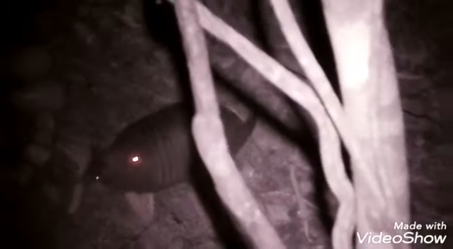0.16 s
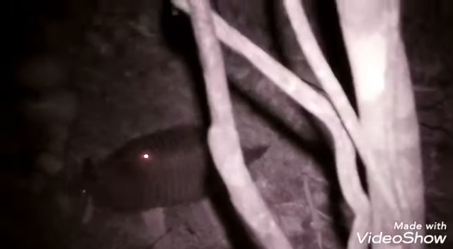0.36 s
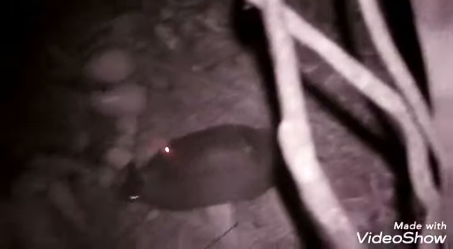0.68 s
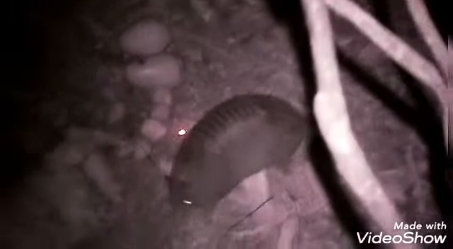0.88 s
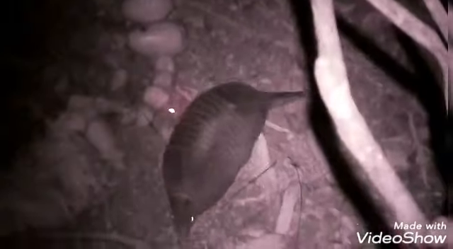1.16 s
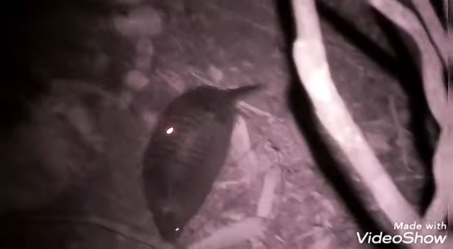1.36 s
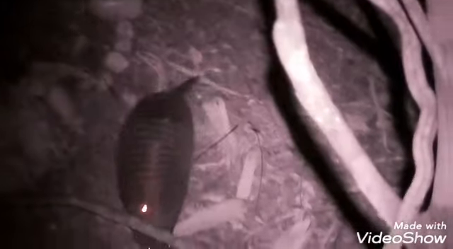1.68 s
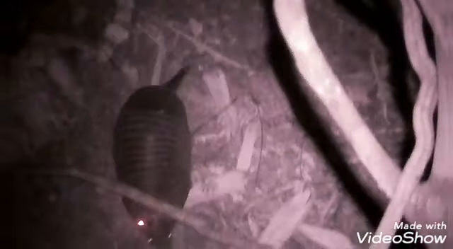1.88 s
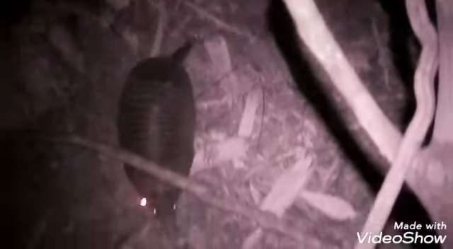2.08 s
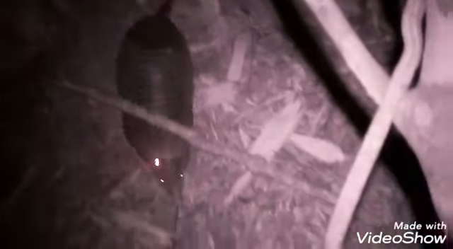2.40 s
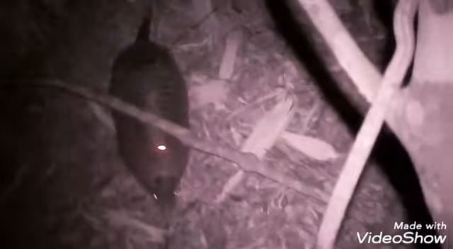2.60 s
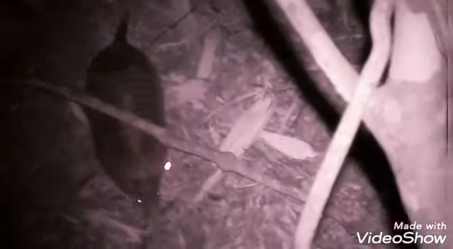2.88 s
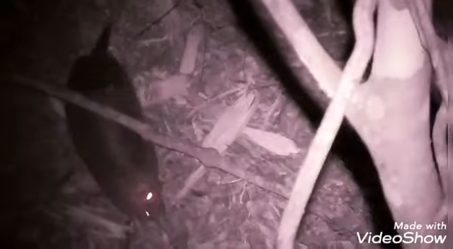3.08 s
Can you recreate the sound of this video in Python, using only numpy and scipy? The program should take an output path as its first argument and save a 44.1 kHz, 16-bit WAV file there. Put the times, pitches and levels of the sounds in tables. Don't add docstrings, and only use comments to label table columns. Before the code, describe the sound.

Dense high cricket chorus outdoors at night, close mono microphone; the nearest singer pauses briefly around one second, then resumes. Fainter trills, tiny frog-like croaks and pings, soft low hum and hiss underneath.

```python
import sys
import numpy as np
from scipy import signal
from scipy.io import wavfile
from scipy.ndimage import uniform_filter1d

SR = 44100
rng = np.random.default_rng(int(sys.argv[2]) if len(sys.argv) > 2 else 0)


def natural_amplitude(level_db):
    exponent = np.asarray(level_db, float) / 20
    return 10 ** exponent


def transcribe(signal):
    frames = np.atleast_2d(signal).T
    limited = np.clip(frames, -1, 1)
    pcm = np.round(limited * 32767).astype(np.int16)
    wavfile.write(sys.argv[1], SR, pcm)


N = 143325

# start_s, level_db, repeat_s
HIGH_SONG = [
    (.022, -50, .1057),
    (.339, -47, .1056),
    (1.078, -43.5, .1055),
    (1.5, -43, .104),
    (1.917, -43, .104),
    (2.542, -44, .105),
    (3.274, -44, 1),
]
SIDE_SONG = [
    (-.02, -51, .106),
    (.401, -45.5, .1065),
    (.827, -47, .1065),
    (1.04, -54, .1065),
    (1.466, -53, 1),
    (1.586, -45, .101),
    (1.99, -56, 1),
    (2.132, -44, .107),
    (3.307, -53.5, 1),
]
LOW_SONG = [
    (.567, -53, .104),
    (.879, -51, .102),
    (1.288, -51, .104),
    (1.81, -53, .104),
    (2.016, -52, .104),
    (2.766, -53, .104),
    (3.28, -53, 1),
]
GLIDE_SONG = [
    (-.011, -56, .0286),
    (.504, -56, .0302),
    (1.017, -56, .03),
    (1.406, -56, 1),
    (1.432, -56, .0243),
    (1.943, -56, .0258),
    (2.149, -56, .0276),
    (2.397, -56, .029),
    (2.775, -56, .0297),
    (3.252, -56, 1),
]
PIPE_SONG = [
    (.31, -71, .037),
    (.423, -65, .04),
    (.504, -64, .034),
    (.641, -62, .035),
    (.851, -62, .0355),
    (1.67, -62, .0357),
    (2.099, -61.5, .036),
    (2.173, -65, 1),
]
RISING_SONG = [
    (.3, -72, .036),
    (.47, -67, .036),
    (2.26, -74, 1),
]
BUZZ_SONG = [
    (.394, -70, .01235),
    (.55, -67, .01235),
    (.9, -68, .0125),
    (.95, -76, 1),
    (2.5, -76, .0125),
    (3.26, -70, 1),
]
FAST_SONG = [
    (.6, -62, .0135),
    (.92, -56, .0135),
    (1.06, -54, .0135),
    (1.4, -55, .0135),
    (1.6, -61, .0135),
    (2.4, -62, .0135),
    (2.6, -58, .0135),
    (3.26, -55, 1),
]
TICK_SONG = [
    (.2, -69, .103),
    (.407, -65, .101),
    (.707, -66, .103),
    (1.118, -73, .104),
    (1.433, -68, .104),
    (1.744, -71, .104),
    (1.953, -68, 1),
]
FROG_SONG = [(.07, -71, .019), (.36, -66, .0195), (.58, -67, .02), (.69, -73, 1), (.93, -68, .019),
             (1.03, -69, 1), (1.125, -69, .02), (1.31, -70, 1), (1.752, -67, .022), (2.072, -66, 1),
             (2.43, -69, .02), (2.716, -65, .019), (2.85, -69, .02), (2.98, -72, 1), (3.128, -70, .018),
             (3.26, -69, 1)]
TOAD_SONG = [
    (1.43, -72, .02),
    (1.66, -73, 9),
    (3.08, -71, .02),
    (3.26, -71, 1),
]
BELL_SONG = [
    (.523, -61, 1),
    (.598, -61, 9),
    (2.85, -59, 1),
    (2.917, -59.5, 1),
]
CHIME_SONG = [
    (1.33, -67, 1),
    (1.395, -67, 1),
    (1.775, -66.5, 1),
    (1.842, -66, 1),
    (2.408, -64.5, 1),
    (2.475, -65, 1),
    (2.829, -65, 1),
    (2.893, -67, 1),
    (3.245, -65, 1),
]
PEEP_SONG = [
    (2.08, -71, 1),
    (2.725, -70, 1),
    (3.1, -71, 1),
]
# start_s, first_stroke_db, second_stroke_db
LOUD_CHIRPS = [(.002, -38, -38), (.107, -37.5, -40), (.212, -44, -36.5), (.318, -39.5, -38),
               (.416, -40.5, -41.5), (.523, -39, -38), (.626, -38.5, -40.5), (.733, -38.5, -39.5),
               (.842, -42, -42.5), (0.943, -45, -59), (1.478, -39, -40), (1.581, -44, -41),
               (1.682, -40.5, -38), (1.784, -41.5, -40), (1.889, -44, -39.5), (1.995, -40, -38),
               (2.101, -37, -40), (2.199, -38, -38.5), (2.304, -43.5, -44), (2.4, -37.5, -46),
               (2.558, -42.5, -48), (2.661, -41, -43), (2.761, -40, -36.5), (2.865, -44, -47),
               (2.969, -39.5, -41), (3.069, -39, -40.5), (3.166, -42.5, -39.5), (3.27, -47, -47)]

# pitch_hz, sag_ratio, length_s, second_harmonic_db, third_harmonic_db
HIGH_VOICE = (4132, .09, .028, -28, -25)
SIDE_VOICE = (4125, .08, .027, -19, -27)
LOW_VOICE = (3880, .06, .027, -21, -18)
LOUD_VOICE = (4012, .06, .027, -35, -31)
GLIDE_VOICE = (5390, .085, .02)
PIPE_VOICE = (4572, .02, .025, -40, -12)
RISING_VOICE = (4450, .04, .022)
BUZZ_VOICE = (5030, .04, .009, 2, -2.5)
FAST_VOICE = (4990, .03, .011, -26)
TICK_VOICE = (7060, .04, .011)
FROG_VOICE = (2170, .07, .012)
TOAD_VOICE = (2340, .05, .012)
BELL_VOICE = (3330, .025, .021)
CHIME_VOICE = (3080, .05, .018)
PEEP_VOICE = (3210, .02, .022)
# time_s, pitch_ratio
PIPE_WARMING = ((.3, .56), (.935, 1))

# lowest_hz, highest_hz, level_db, repeat_s
FAR_PAIRS = (3965, 4035, -48, .104)
FAR_DULL = (3660, 3900, -57.5, .106)
FAR_TRILLS = (4980, 5330, -60.5, .027)
FAR_MID = (4240, 4850, -66.5, .03)
# sag_ratio, length_s, second_harmonic_db, third_harmonic_db
FAR_PAIR_VOICE = (.08, .027, -25, -25)
FAR_TRILL_VOICE = (.05, .019, -28, -34)

# freq_hz, density_db
HUM_SPECTRUM = [(21, -30), (35, 0.5), (158, -9.5), (239, -4.5), (402, -10), (652, -10.5), (1900, -21.5),
                (2470, -18), (4180, -120)]
HISS_SPECTRUM = [(1500, -4), (3000, 0), (5500, 1), (7000, -1.8), (13000, 0.5), (15000, -4.7), (16000, 6.5)]
ROAD_SPECTRUM = [(200, 6), (350, -2), (700, -1), (1100, -7), (1600, -13)]
# time_s, level_db
ROAD_LEVEL = [
    (0.0, -59),
    (.25, -63.5),
    (.45, -68.5),
    (.8, -62),
    (1.3, -59.5),
    (1.6, -69),
    (2.3, -73),
    (3.25, -92),
]

# start_s, level_db, length_s, centre_hz
RUSTLES = [(0.0, -62, .03, 7000), (.1, -66, .04, 9000), (.195, -64, .02, 9000), (.43, -67, .03, 14000),
           (.63, -67, .04, 9000), (.815, -63, .03, 10000), (1.14, -62, .02, 6000), (1.24, -64, .031, 8000),
           (1.8, -69, .15, 9000), (2.135, -59, .016, 17000), (2.742, -60, .045, 10000),
           (2.848, -65, .02, 10000)]
# start_s, peak_db
TICKS = [
    (.195, -54),
    (.44, -57),
    (.82, -55),
    (1.1413, -54),
    (2.143, -53),
    (2.2992, -61),
    (2.5641, -57),
    (2.778, -54),
    (2.8489, -56),
    (3.0609, -60),
]

PAIR_S, BELL_PAIR_S = .032, .021
LATE, LATE_BEND = 1.7, 7


def evened(x):
    return x / np.sqrt(np.mean(x ** 2) + 1e-20)


def add(mix, start_s, sound):
    at = round(start_s * SR)
    part = mix[max(at, 0):max(at + len(sound), 0)]
    part += sound[max(-at, 0):][:len(part)]


def stroke(bend, late, turn, hz, sag, length_s, second_db=-40, third_db=-40):
    u = np.arange(0, length_s, 1 / SR) / length_s
    pitch_hz = hz * (1 - sag * u ** bend)
    phase = 2 * np.pi * (np.cumsum(pitch_hz) / SR + turn)
    tone = np.sin(phase) + natural_amplitude(second_db) * np.sin(2 * phase) + natural_amplitude(third_db) * np.sin(3 * phase)
    swell = np.sin(np.pi * u ** late) ** .8
    return 1.5 * swell * tone


def sing(song, voice, pair_s=None, second_db=0, bend=5, wobble_db=.9, waver=.002, late=1.2,
         warming=((0, 1), (1, 1))):
    out, marks = np.zeros(N), np.array(song, float)
    runs = []
    for (start_s, _, repeat_s), end_s in zip(song, marks[1:, 0]):
        calls = max(round((end_s - start_s) / repeat_s), 1)
        runs.append(np.linspace(start_s, end_s, calls, endpoint=False))
    times = np.append(np.concatenate(runs), marks[-1, 0])
    hz, *shape = voice
    peak_s = (.5 ** (1 / late) - .06) * voice[2]
    luck = rng.standard_normal((300, 8))
    for s, r in zip(times, luck):
        level_db = np.interp(s, marks[:, 0], marks[:, 1])
        warm_hz = hz * np.interp(s, *warming)
        for k in range(2 if pair_s else 1):
            db = level_db + wobble_db * r[k] + k * second_db
            one = stroke(bend, late, r[4 + k], warm_hz * (1 + waver * r[2 + k]), *shape)
            add(out, s + k * (pair_s or 0) + .0008 * r[6 + k] - peak_s, natural_amplitude(db) * one)
    return out


def pair_crickets():
    out = np.zeros(N)
    for song, voice in ((HIGH_SONG, HIGH_VOICE), (SIDE_SONG, SIDE_VOICE), (LOW_SONG, LOW_VOICE)):
        out += sing(song, voice, PAIR_S, second_db=.3, bend=LATE_BEND, late=LATE)
    strokes = []
    for start_s, *pair_db in LOUD_CHIRPS:
        for k, db in enumerate(pair_db):
            strokes.append((start_s + k * PAIR_S, db, np.inf))
    return out + sing(strokes, LOUD_VOICE, bend=LATE_BEND, late=LATE)


def gliding_triller():
    return sing(GLIDE_SONG, GLIDE_VOICE, bend=1.3, wobble_db=1.6, waver=.005)


def crowd(lo_hz, hi_hz, level_db, repeat_s, voice, pair_s, count):
    out = np.zeros(N)
    waver = .004 if pair_s else .008
    for k, (late, pace, loud) in enumerate(rng.random((count, 3))):
        hz = lo_hz + (hi_hz - lo_hz) * k / (count - 1)
        start = (-repeat_s * late, 6 * loud, repeat_s * (.96 + .08 * pace))
        end = (N / SR + late * repeat_s, 6 - 6 * loud, 1)
        out += sing([start, end], (hz, *voice), pair_s, bend=LATE_BEND, wobble_db=1.5, waver=waver, late=LATE)
    return natural_amplitude(level_db) * evened(out)


def far_chorus():
    pairs = crowd(*FAR_PAIRS, FAR_PAIR_VOICE, PAIR_S, count=11)
    dull = crowd(*FAR_DULL, (.06, .027, -15, -17), PAIR_S, count=9)
    trills = crowd(*FAR_TRILLS, FAR_TRILL_VOICE, None, count=6)
    mid = crowd(*FAR_MID, FAR_TRILL_VOICE, None, count=8)
    return pairs + dull + trills + mid


def foliage_scatter(x):
    t60_s, onset_s = .22, .012
    t = np.arange(SR // 2) / SR
    tail = rng.standard_normal(len(t)) * natural_amplitude(-60 * t / t60_s) * np.minimum(t / onset_s, 1)
    return signal.fftconvolve(x, tail / np.linalg.norm(tail))[:N]


def leaf_rustles():
    out = np.zeros(N)
    for start_s, level_db, length_s, hz in RUSTLES:
        spikes_db = 2.5 * np.minimum(rng.exponential(1, SR // 2), 3)
        grit = rng.standard_normal(SR // 2) * natural_amplitude(spikes_db)
        edges_hz = [hz * .45, min(hz * 1.8, SR / 2.1)]
        band = signal.butter(2, edges_hz, "band", fs=SR, output="sos")
        grit = evened(signal.sosfilt(band, grit))
        u = np.arange(SR // 2) / SR / length_s
        add(out, start_s, natural_amplitude(level_db + 3.5) * grit * np.minimum(u / .15, 1) * np.exp(-u ** 2))
    return out


def noise(spectrum, patchy_db):
    frames, hz = N // 256 + 5, np.fft.rfftfreq(1024, 1 / SR)
    a, b, patches = rng.standard_normal((frames, 513, 3)).T
    patches = uniform_filter1d(patches, size=14, axis=0)
    patches = evened(uniform_filter1d(patches, size=12, axis=1))
    f, db = np.transpose(spectrum)
    shape_db = np.interp(np.log(hz + 1), np.log(f + 1), db, left=-30, right=-60)
    cells = (a + 1j * b) * natural_amplitude(shape_db[:, None] + patchy_db * patches)
    return evened(signal.istft(cells, nperseg=1024, noverlap=768)[1][:N])


def air():
    t = np.arange(N) / SR
    drone = natural_amplitude(-65) * np.minimum(.15 + 1.6 * t, 1.2) * np.sin(2 * np.pi * 30 * t + 2 * np.sin(9 * t))
    road = natural_amplitude(np.interp(t, *np.transpose(ROAD_LEVEL))) * noise(ROAD_SPECTRUM, patchy_db=2.0)
    hum = natural_amplitude(-59.5) * noise(HUM_SPECTRUM, patchy_db=.12)
    hiss = natural_amplitude(-62) * noise(HISS_SPECTRUM, patchy_db=2.0)
    return drone + road + hum + hiss


def frogs():
    frog = sing(FROG_SONG, FROG_VOICE, bend=1.2, wobble_db=3, waver=.013)
    toad = sing(TOAD_SONG, TOAD_VOICE, wobble_db=3.5, waver=.015)
    return natural_amplitude(-1.2) * frog + toad


def twigs():
    out = np.zeros(N)
    t = np.arange(60) / SR
    snap = np.sin(2 * np.pi * 13000 * t) * np.exp(-t / .00022)
    add(out, 2.1372, natural_amplitude(-42) * snap)
    for (start_s, peak_db), hz in zip(TICKS, rng.uniform(9000, 14000, len(TICKS))):
        tick = np.sin(2 * np.pi * hz * t) * np.exp(-t / .0002)
        add(out, start_s, natural_amplitude(peak_db + 8) * tick)
    return out


def small_trillers():
    out = sing(TICK_SONG, TICK_VOICE, bend=2)
    out += sing(PIPE_SONG, PIPE_VOICE, warming=PIPE_WARMING)
    out += sing(RISING_SONG, RISING_VOICE, waver=.008)
    out += sing(BUZZ_SONG, BUZZ_VOICE, bend=1.5, wobble_db=1.5, waver=.004)
    return out + sing(FAST_SONG, FAST_VOICE, bend=2, waver=.006)


def bells():
    out = np.zeros(N)
    for song, voice in ((BELL_SONG, BELL_VOICE), (CHIME_SONG, CHIME_VOICE), (PEEP_SONG, PEEP_VOICE)):
        out += sing(song, voice, BELL_PAIR_S, second_db=-7, bend=1.7)
    return out


def scene():
    near = pair_crickets() + gliding_triller() + frogs() + small_trillers() + bells()
    far = far_chorus()
    singers = near + natural_amplitude(-9) * foliage_scatter(near)
    singers += .7 * far + .5 * natural_amplitude(3) * foliage_scatter(far)
    return (singers + leaf_rustles() + twigs() + air())[None]


def top_cut(x):
    return signal.sosfilt(signal.butter(12, 16030, fs=SR, output="sos"), x)


def record(dry):
    edge = signal.firwin(2047, 15745, window=("kaiser", 8), fs=SR)
    mix = signal.oaconvolve(dry, edge[None], "same")
    return top_cut(mix)


dry = scene()
out = record(dry)
transcribe(out)
```